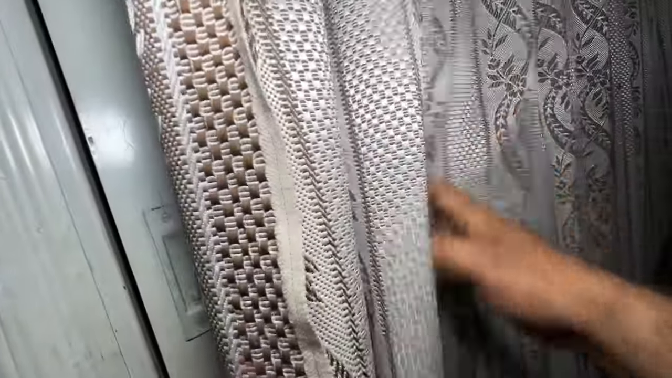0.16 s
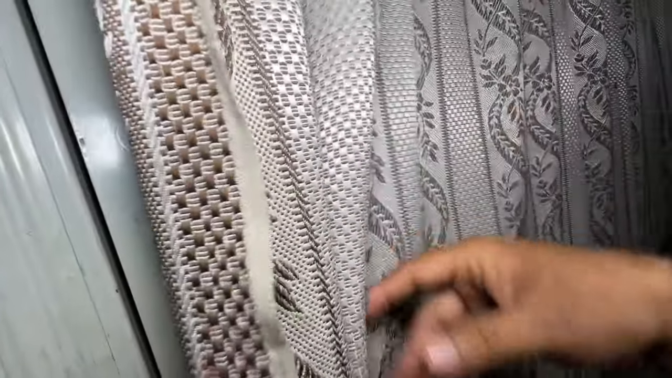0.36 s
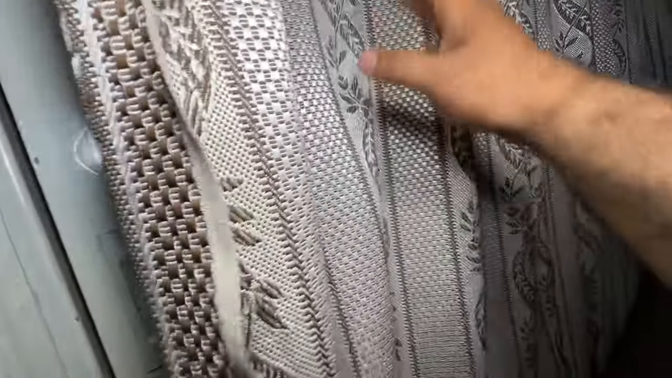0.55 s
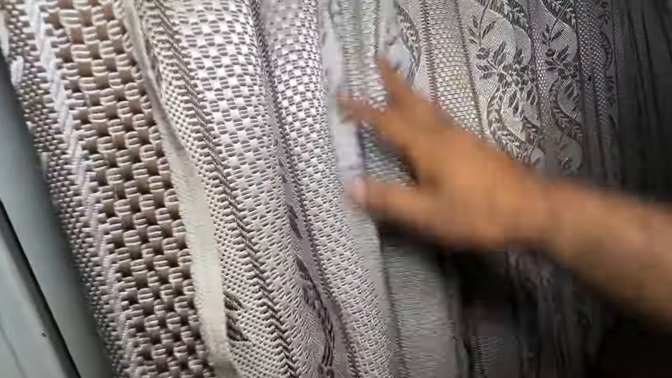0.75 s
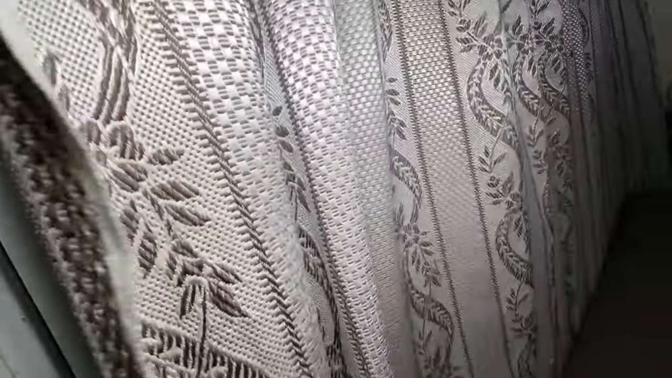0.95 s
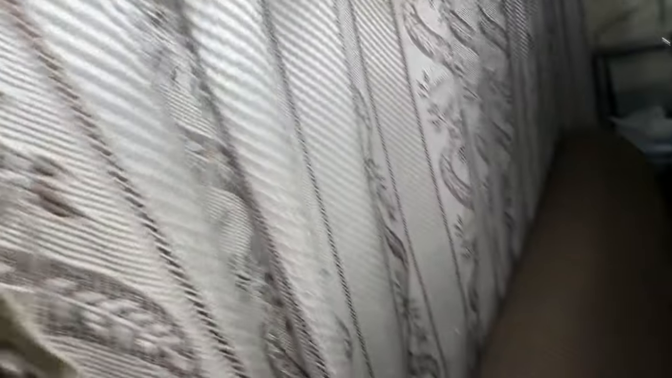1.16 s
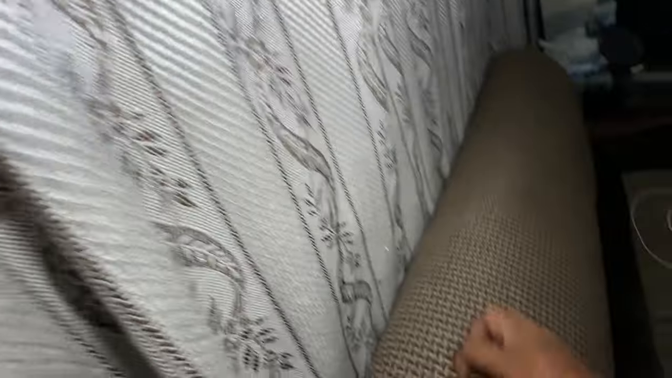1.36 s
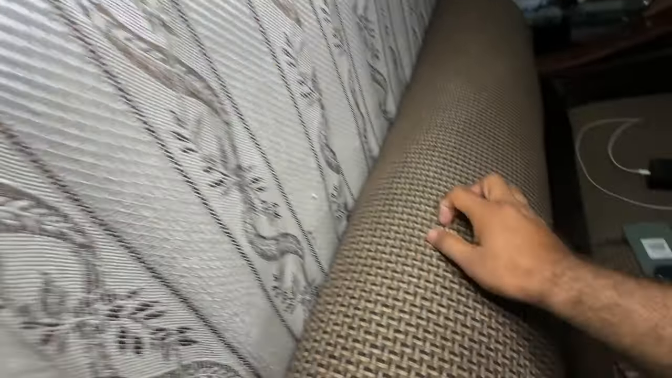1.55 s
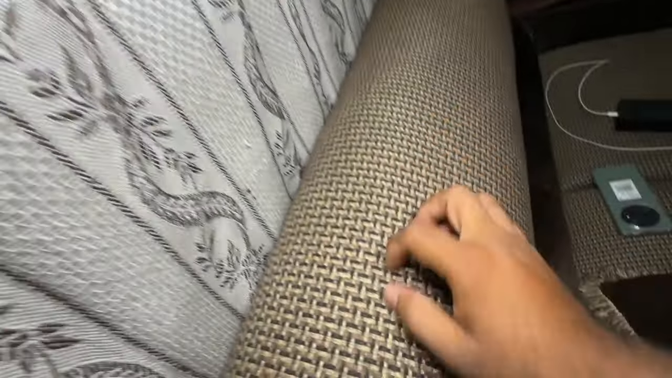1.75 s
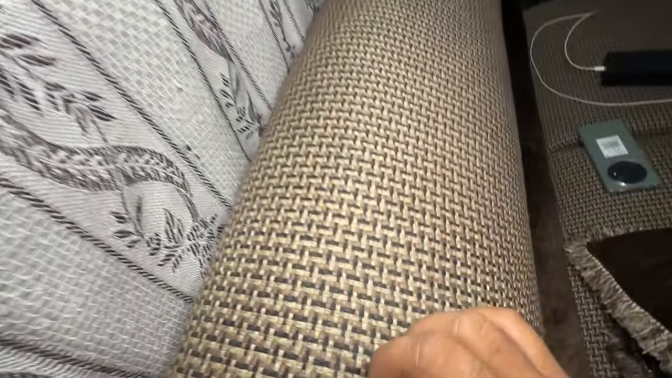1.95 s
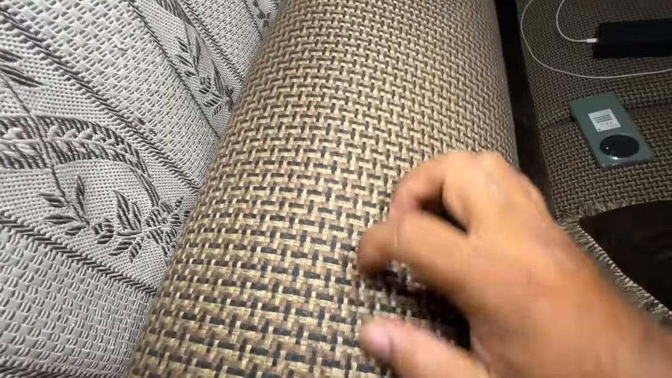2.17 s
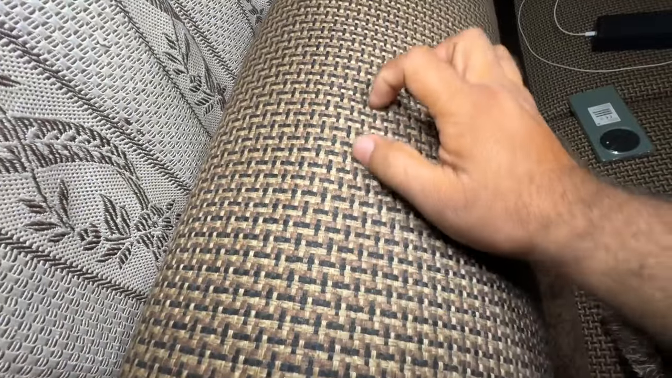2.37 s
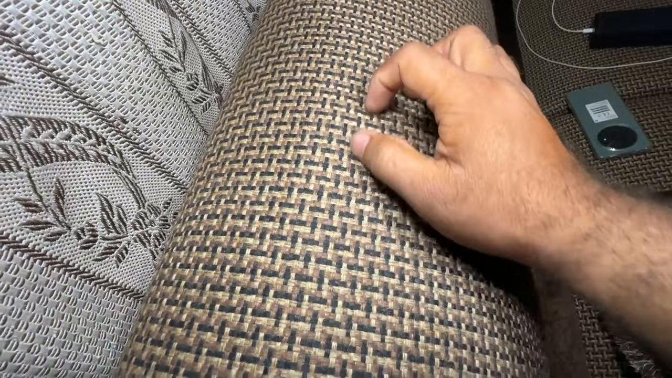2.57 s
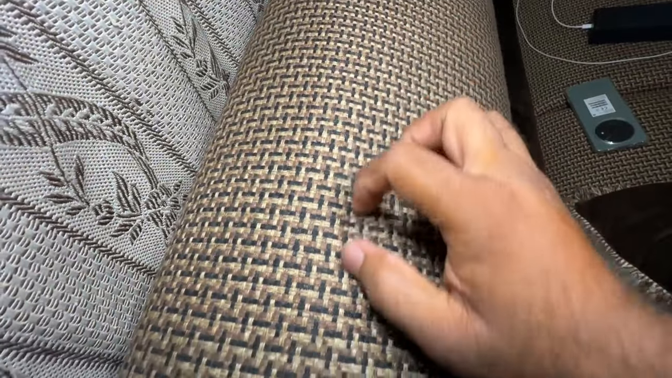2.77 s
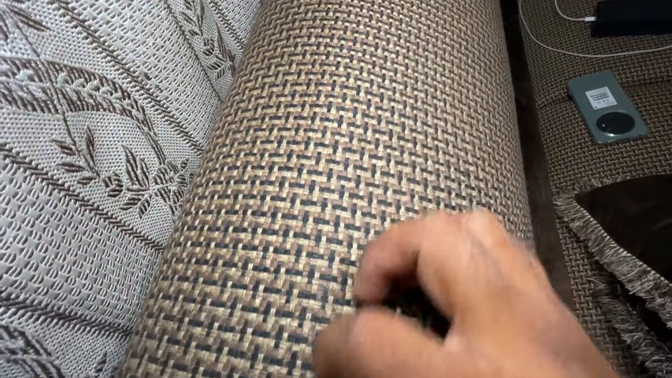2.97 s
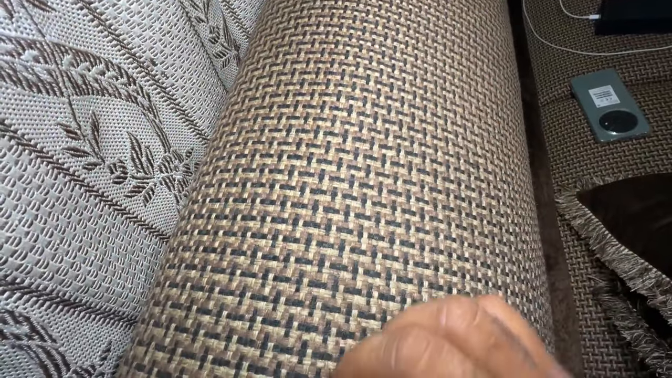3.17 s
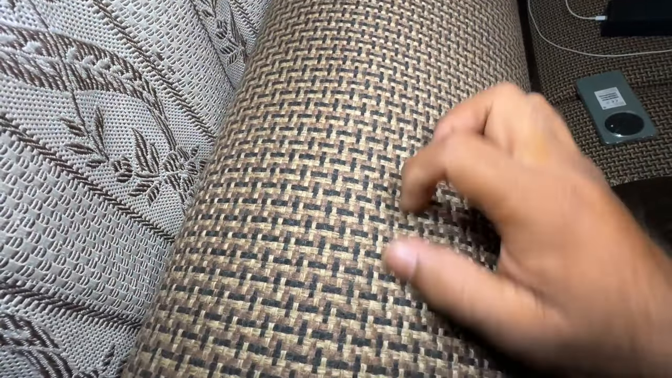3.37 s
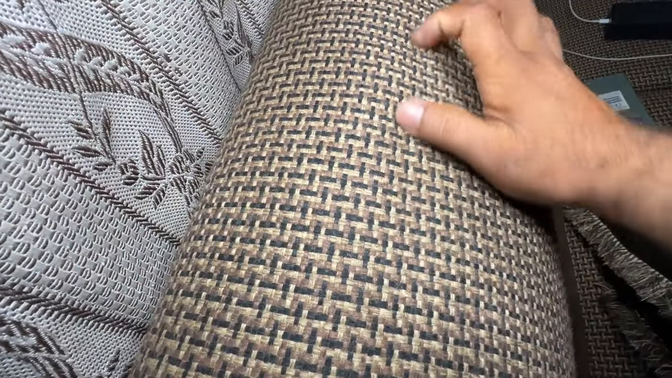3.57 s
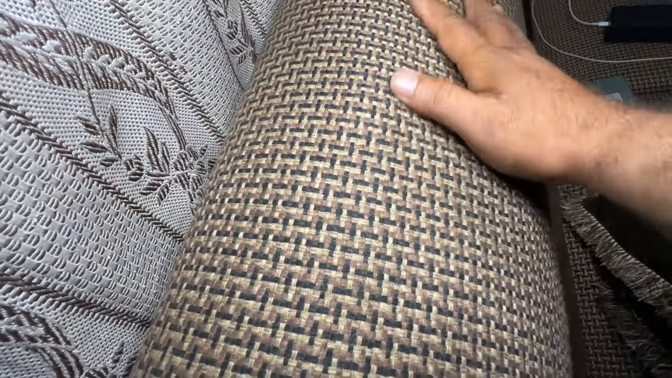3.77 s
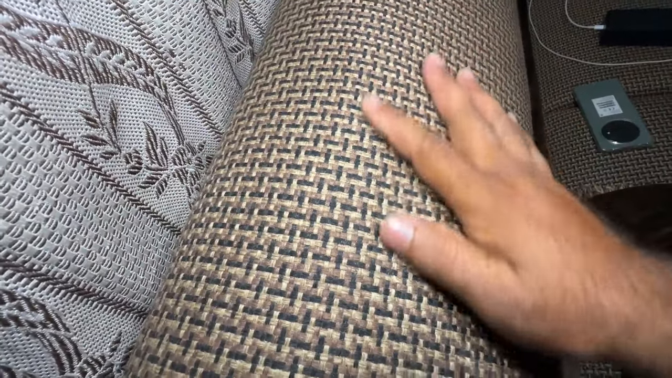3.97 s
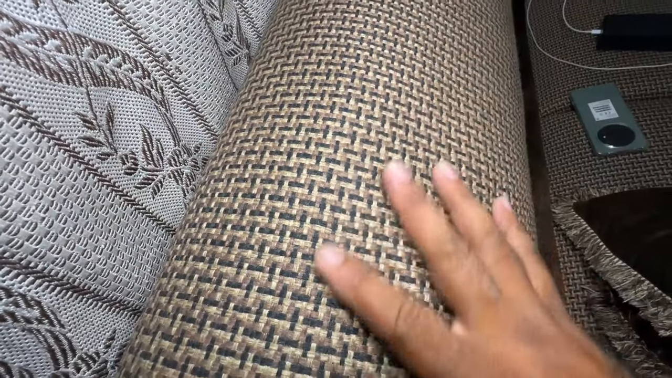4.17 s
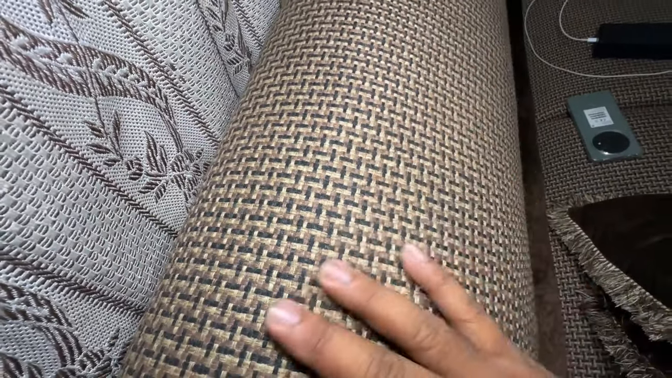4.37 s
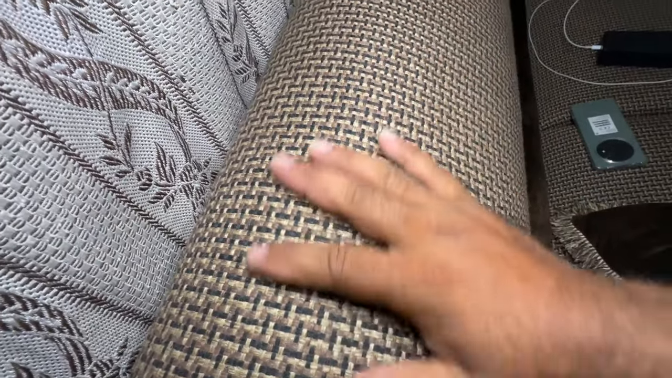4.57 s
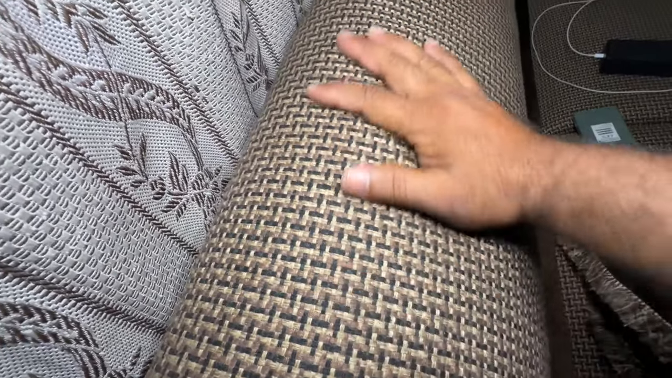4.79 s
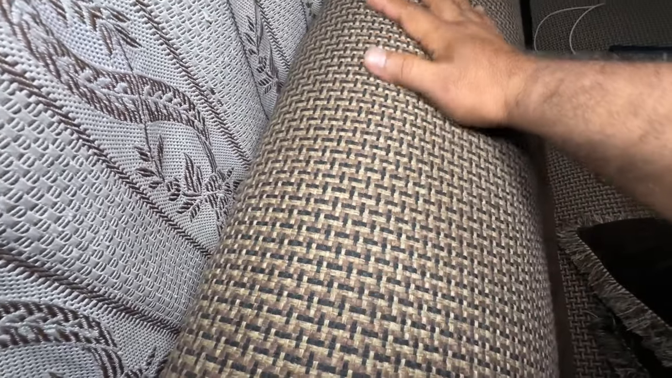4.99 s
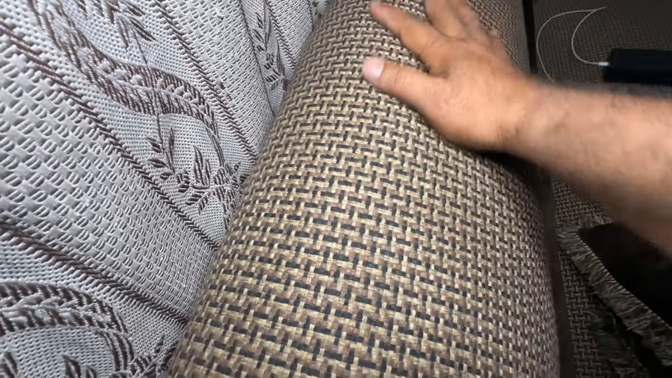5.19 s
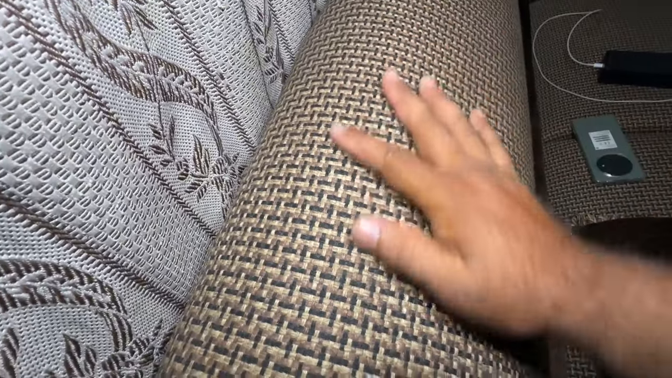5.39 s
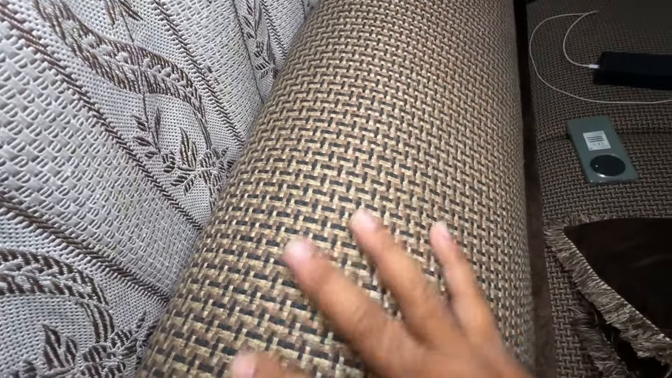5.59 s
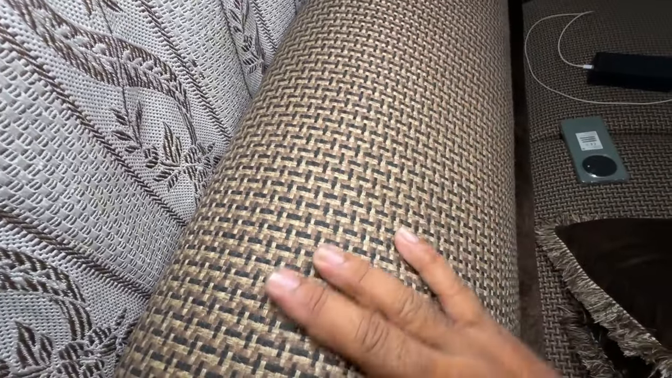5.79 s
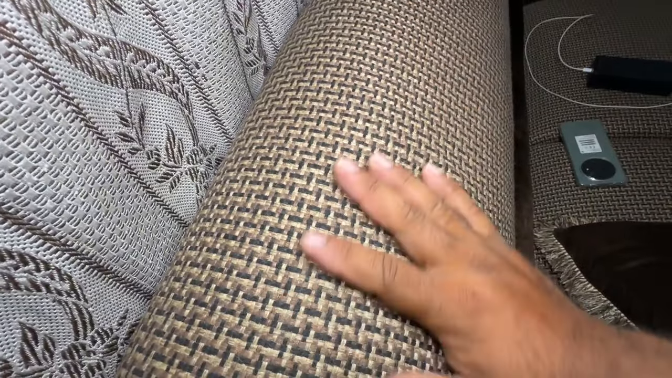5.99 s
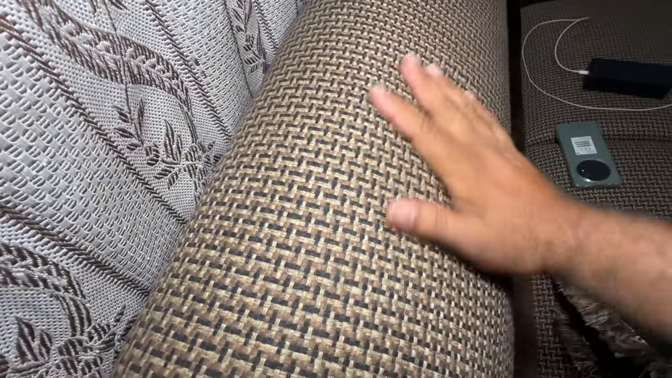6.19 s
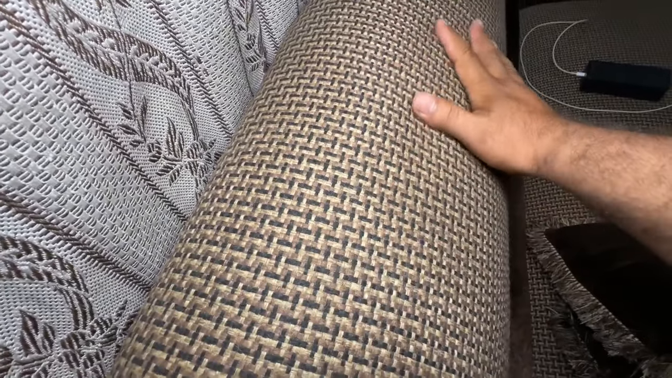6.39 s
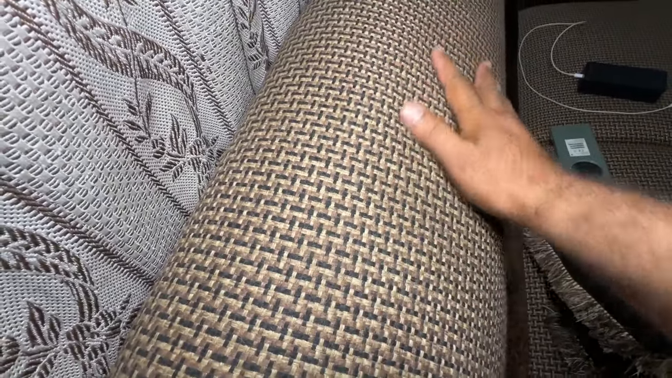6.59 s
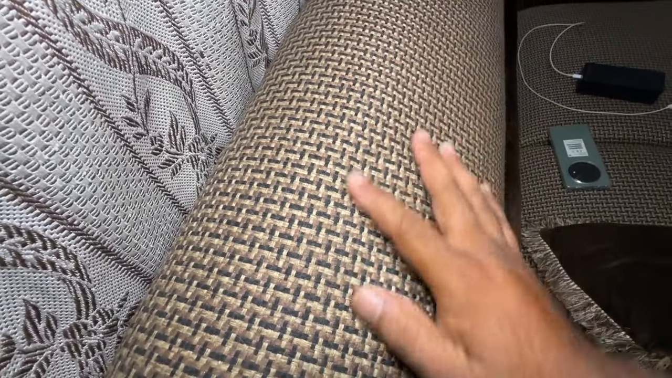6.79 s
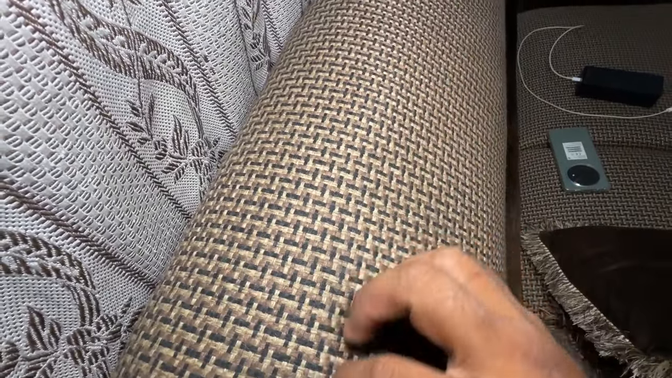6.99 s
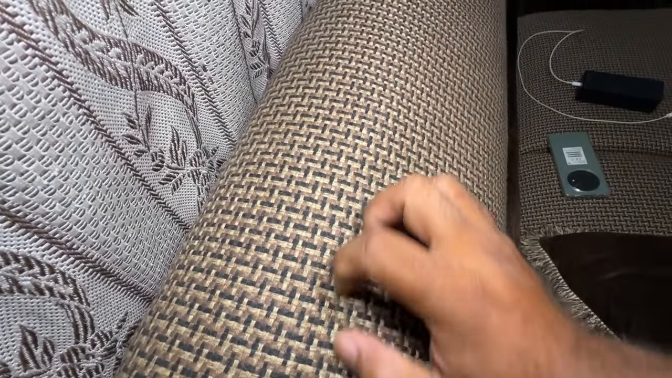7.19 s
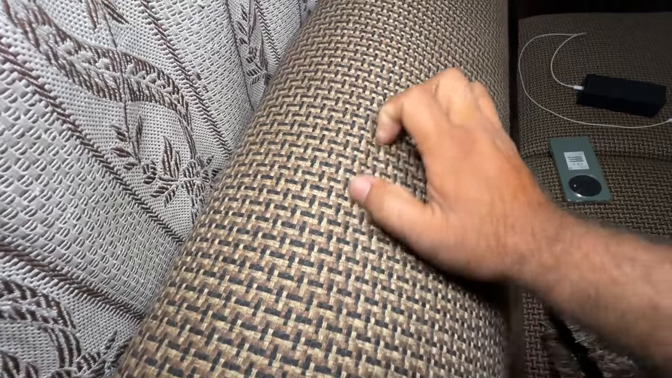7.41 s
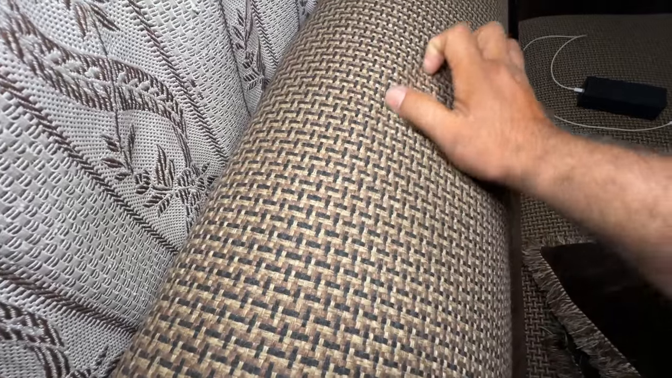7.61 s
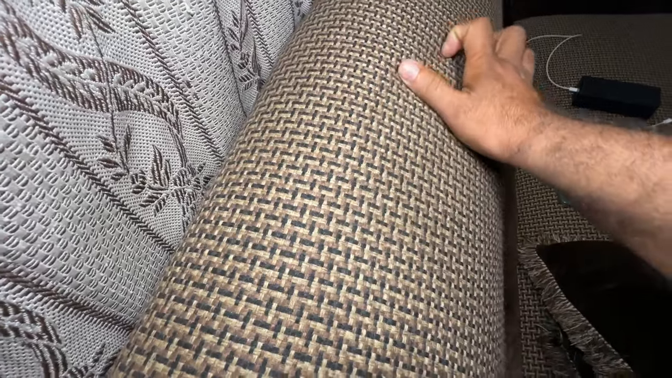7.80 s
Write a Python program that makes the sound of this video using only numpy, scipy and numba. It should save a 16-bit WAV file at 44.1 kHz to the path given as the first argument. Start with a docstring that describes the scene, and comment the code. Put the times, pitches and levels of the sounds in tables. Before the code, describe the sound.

In a quiet furnished room, close up, fingers brush and flick a loose woven cover with quick hisses, ticks and dull flaps. Fingernails then rake a coarse padded sofa arm, rasping over a low hollow thrum, with sharp snaps as threads catch. Flat fingers stroke to and fro in soft, airy swishes, and finally the nails scratch again, more gently. A faint steady room tone lies underneath.

```python
"""Fingernails rake a coarse sofa arm: thread after thread is plucked, so the padding thrums and the weave rasps.
Now and then a thread catches and snaps free with a sharp spike. Before that, fingers brush a hanging woven
cover that flutters and hisses, with flicks and dull flaps. Near the end of the raking and between its two bouts,
flat fingers stroke to and fro with a soft swish. Plucks are pulses and fine fibres are noise, shaped by filters
and by the speed of the hand. A quiet furnished room adds weak reflections and a steady background."""
import sys
import numpy as np
from scipy import signal
from scipy.fft import rfft, irfft
from scipy.io import wavfile
from scipy.ndimage import uniform_filter1d
from numba import njit

SR = 44100
rng = np.random.default_rng(int(sys.argv[2]) if len(sys.argv) > 2 else 0)


def file_out(sig):
    """Save sig as 16-bit WAV at sys.argv[1]."""
    # one column per channel
    cols = np.atleast_2d(sig).T
    # limit, then scale
    lim = np.clip(cols, -1, 1)
    pcm = np.round(lim * 32767).astype(np.int16)
    wavfile.write(sys.argv[1], SR, pcm)


N = 346185
T = np.arange(N) / SR  # time in s


def undb(db):
    """Turn decibels into a gain."""
    return 10 ** (np.asarray(db) / 20)


def unit(x):
    """Scale to rms 1, an average strength of one."""
    return x / np.sqrt(np.mean(x ** 2))


def speeds(strokes):
    """Speed of the hand in each stroke, 0-1: it starts from rest, peaks and slows to rest again."""
    curves = []
    for start, rise, fall, fullness, *_ in strokes:
        ramp = np.interp(T, start + np.cumsum([0, rise, fall]), [0, 1, 0])
        curves.append(1 - (1 - ramp) ** fullness)
    return np.array(curves)


def gains(speed, levels_db, powers):
    """One gain curve per layer: amplitude grows as speed to a power, and overlapping strokes add in power."""
    curves = []
    for db, power in zip(levels_db, powers):
        layer_power = undb(db) ** 2 @ (speed + 1e-9) ** (2 * power)
        curves.append(np.sqrt(layer_power))
    return np.array(curves)


def per_stroke(speed, values):
    """Each stroke's own value (a number or a curve), blended where strokes overlap."""
    curves = np.reshape(values, (len(speed), -1)) * np.ones(N)
    return np.average(curves, axis=0, weights=speed + 1e-9)


def pitch(speed, hz, sag):
    """Each stroke has its own pitch, which loses the share sag (0-1) as the hand comes to rest."""
    slowness = 1 - speed.max(axis=0)
    return per_stroke(speed, hz) * (1 - sag * slowness)


def wobble(depth_db, rate):
    """Uneven pressure: a gain that wanders at random around 1, with rate new random values per s."""
    wander = np.interp(T * rate, np.arange(N), rng.standard_normal(N))
    return undb(depth_db * wander)


def steady(x, span_s):
    """An even pressure of the hand holds the strength of a vibration near rms 1."""
    size = int(span_s * SR)
    power = uniform_filter1d(uniform_filter1d(x ** 2, size), size)
    return x / np.sqrt(power + 1e-9)


def colour(x, points):
    """Tone colour from (f/Hz, level/dB) points; the filter never acts early, so clicks keep their attack."""
    hz, db = np.transpose(points)
    size = 4096
    bins = np.maximum(np.fft.rfftfreq(size, 1 / SR), 1)
    # folding the cepstrum gives the minimum-phase filter with this spectrum
    cepstrum = irfft(np.log(undb(np.interp(np.log(bins), np.log(hz), db))))
    cepstrum[1:size // 2] *= 2
    cepstrum[size // 2 + 1:] = 0
    response = irfft(np.exp(rfft(cepstrum)))
    return unit(signal.fftconvolve(x, response)[:len(x)])


def resonate(x, hz, width_hz):
    """One damped resonance, gain 1 at its centre."""
    return signal.lfilter(*signal.iirpeak(hz, hz / width_hz, fs=SR), x)


@njit
def sweep(x, hz, width_hz):
    """A resonance whose centre moves from sample to sample (state-variable band-pass)."""
    y, band, low = np.empty(len(x)), 0., 0.
    for i in range(len(x)):
        g, k = np.tan(np.pi * hz[i] / SR), width_hz / hz[i]
        v = (band + g * (x[i] - low)) / (1 + g * (g + k))
        band, low, y[i] = 2 * v - band, low + 2 * g * v, k * v
    return y


def body(x, modes, top_hz):
    """A soft body: its modes ring, and the stuffing swallows the treble."""
    ring = sum(undb(db) * resonate(x, hz, width) for hz, width, db in modes)
    return unit(signal.sosfilt(signal.butter(2, [80, top_hz], "band", fs=SR, output="sos"), ring))


def crossings(rate, jitter):
    """Sample positions where a finger slips over the next thread of an uneven weave; median gap 1 / rate s."""
    gaps = np.exp(jitter * rng.standard_normal(N // 10)) / rate
    at = (np.cumsum(gaps) * SR).astype(int)
    return at[at < N]


def plucks(rate, jitter, scatter_db):
    """A pulse of random strength for each thread crossed."""
    strength = undb(scatter_db * np.clip(rng.standard_normal(N), -2, 2))
    at = crossings(rate, jitter)
    return np.bincount(at, strength[at], N)


def fibres(slips, decay_s, share):
    """Countless fibre clicks as noise; a share of its power comes in a short flurry after each slip."""
    flurry = signal.lfilter([1], [1, -np.exp(-1 / (decay_s * SR))], slips ** 2)
    return rng.standard_normal(N) * np.sqrt(1 - share + share * flurry / flurry.mean())


def place(sound, start_s):
    """A short sound set into the silence at its time."""
    return np.pad(sound, (int(start_s * SR), N))[:N]


# colour of the quiet room: (f/Hz, relative level/dB)
ROOM_TONE_COLOUR = [(20, -5), (35, -6), (52, -34), (120, 0.5), (220, 1), (420, 2.5), (700, -9.5),
                    (1500, -15.5), (3000, -19), (5700, -26), (6350, -23), (8500, -33), (16000, -33)]


def room_tone():
    """The steady, quiet background of the room: noise with a fixed colour."""
    return undb(-55) * colour(rng.standard_normal(N), ROOM_TONE_COLOUR)


# fingers brushing the hanging cover, levels before the final mix of layers: (start t/s, speeding up t/s,
# slowing down t/s, fullness: 1 = straight ramps, more = flatter top, less = sharper peak,
# flutter level/dB, rasp level/dB, fibre hiss level/dB, swish f/Hz at full speed)
COVER_STROKES = [(-0.02, 0.02, 0.021, 1.7, -54, -41, -47.5, 2000),
                 (0.045, 0.032, .045, 1.3, -64, -75, -69, 3000),
                 (0.133, 0.075, .1, 1.7, -44, -56.5, -48, 3440),
                 (0.398, .03, 0.099, 1.6, -53, -48, -63, 1500),
                 (0.462, 0.067, 0.096, 2.1, -41.5, -46.5, -52, 3000),
                 (0.717, 0.02, 0.096, 1.9, -47, -52, -53.5, 2800),
                 (0.76, .07, 0.096, 1.6, -57, -64, -50, 5300),
                 (0.845, 0.053, .043, 2.3, -39, -75, -56.5, 6300),
                 (0.95, 0.014, .17, 0.67, -39.5, -76, -75, 3000)]
# the loose cover keeps swaying between touches, levels before the final mix:
# (from t/s, until t/s, flutter level/dB, rasp level/dB, fibre hiss level/dB)
COVER_SWAY = (0, 2.4, -53, -63, -86)
# powers of speed for (flutter, rasp, hiss)
COVER_SPEED_POWERS = (0.99, 0.95, 0.89)
# resonances of the slack cover, also heard in the flicks: (f/Hz, width f/Hz, relative level/dB)
SLACK_MODES = [(108, 19, 0), (184, 40, 12.5), (223, 70, -5), (313, 93, -22), (570, 70, -38)]
# colour of the rub on the thin cover: (f/Hz, relative level/dB)
COVER_RUB_COLOUR = [(200, -27), (430, 5), (580, 9.5), (800, 2.5), (1200, 1.5), (1700, -2), (2600, -8.5),
                    (3600, -21), (7000, -17.5), (16000, -45)]
# colour of its fibre hiss: (f/Hz, relative level/dB)
COVER_HISS_COLOUR = [(500, -12), (1500, -4), (2700, -2), (4600, 1), (6800, -5.5), (8300, -7), (11000, -7.5),
                     (16000, -15)]


def cover():
    """Fingers drag over the loose cloth, which flutters low, rasps and hisses."""
    *_, flutter_db, rasp_db, hiss_db, swish_hz = np.transpose(COVER_STROKES)
    speed = speeds(COVER_STROKES)
    from_s, until_s, *sway_db = COVER_SWAY
    swaying = uniform_filter1d(1. * ((T >= from_s) & (T < until_s)), size=4000)  # softened ends
    touches = gains(speed, (flutter_db, rasp_db, hiss_db), COVER_SPEED_POWERS)
    flutter, rasp, hiss = np.hypot(touches, np.outer(undb(sway_db), swaying))
    slips = plucks(rate=380, jitter=0.65, scatter_db=4)

    low = body(fibres(slips, decay_s=0.0042, share=0.36), SLACK_MODES, top_hz=555)
    low = steady(low, span_s=0.015)
    mid = colour(fibres(slips, decay_s=.001, share=0.54), COVER_RUB_COLOUR)
    high = colour(fibres(slips, decay_s=0.0015, share=0.63), COVER_HISS_COLOUR)
    # a bright moving band within the hiss
    swish = unit(sweep(rng.standard_normal(N), pitch(speed, swish_hz, sag=0.4), 2500.0))
    high = unit(high + undb(-1) * swish)
    return undb(0.5) * flutter * low + undb(1.5) * rasp * mid + undb(2) * hiss * high


# fingertips and folds flicking against the cover, peak levels before the room:
# (t/s, tick level/dB, tick f/Hz, tick width f/Hz, thump level/dB)
FLICK_EVENTS = [(0.021, -45, 1760, 140, -46), (0.14, -42, 1000, 500, -54), (.329, -40.5, 1710, 130, -36.5),
                (.538, -30.5, 2660, 2500, -51), (0.724, -54, 2000, 2000, -43),
                (0.853, -59, 2500, 1500, -32), (0.953, -39, 5040, 2000, -30.5),
                (0.983, -47, 3000, 2500, -36), (1.119, -47, 3500, 2500, -37.5)]


def flicks():
    """A light tick or squeak at the touch, followed by the dull flap of the slack cloth."""
    t, out = T[:8192], np.zeros(N)
    flap = body(1. * (t == 0), SLACK_MODES, top_hz=400)
    flap = flap / np.abs(flap).max()
    grits = rng.standard_normal((len(FLICK_EVENTS), len(t)))
    for (start, tick_db, hz, width, thump_db), grit in zip(FLICK_EVENTS, grits):
        scrape = grit * np.exp(-t / 0.0039)
        tick = resonate(resonate(scrape, hz, width), hz, hz)
        out += place(undb(tick_db) * tick / np.abs(tick).max(), start)
        out += place(undb(thump_db) * flap, start + 0.00253)
    return out


# nail strokes along the sofa arm, levels before the final mix of layers; overlapping rows add up, as when
# the nails ease in or dig harder: (start t/s, speeding up t/s, slowing down t/s, fullness as for the cover,
# thrum level/dB, rasp level/dB, fibre hiss level/dB, padding within the thrum level/dB,
# thrum f/Hz at the peak of speed, thrum glide octaves per s (minus sinks), rasp f/Hz at full speed)
NAIL_STROKES = [(1.318, 0.18, 0.066, 2.5, -43, -43.5, -61, -3.5, 310, -0.3, 600),
                (1.385, 0.072, .05, 1.1, -46, -40, -73, -18, 305, -0.17, 600),
                (1.616, 0.11, .295, 2.3, -35.5, -40.5, -55.5, -3, 354, -0.042, 515),
                (1.715, 0.096, 0.096, 1.9, -48, -34.5, -52.5, -11, 380, 0.35, 525),
                (2.031, .24, 0.19, 1.35, -36, -37, -52.5, -9, 300, -.2, 647),
                (2.54, 0.097, .505, 3.9, -36.5, -38.5, -56, 1.5, 269, 0.83, 524),
                (3.14, 0.2, .08, 0.8, -42.5, -42, -61.5, 0, 285, -0.19, 565),
                (3.255, .09, 0.3, 1.6, -37.5, -39.5, -53.5, -1.5, 327, -0.58, 570),
                (3.475, 0.087, 0.053, 1.1, -36, -28, -45, -4, 257, 0, 620),
                (6.88, 0.051, 0.059, 1.24, -44.5, -42, -64, -2, 347, 0, 625),
                (7.04, 0.19, 0.17, 1.6, -43, -49, -57, 3, 275, -0.57, 520),
                (7.23, .36, .235, 1.84, -41.5, -45.5, -51.5, 1.5, 270, -2.2, 620),
                (7.64, 0.14, 0.054, 1, -40, -45.5, -71, 1, 193, 0, 714),
                (7.816, 0.042, .1, 1, -50, -46.5, -56, 5, 250, 0.016, 600)]
# powers of speed for (thrum, rasp, hiss)
NAIL_SPEED_POWERS = (0.83, 1.035, 0.77)
# resonances of the padded arm: (f/Hz, width f/Hz, relative level/dB)
PADDING_MODES = [(120, 70, -16.5), (217.6, 43, 1.5), (324, 125, -2.5)]
# colour of the rasping weave: (f/Hz, relative level/dB)
RASP_COLOUR = [(150, -29), (380, -5), (520, 4), (720, 4.5), (870, 1), (1080, 0.5), (1500, -4), (2100, -10),
               (2700, -13), (3300, -17.5), (4300, -16), (6500, -25.5), (9000, -39), (16000, -57)]
# colour of the hiss under the nails: (f/Hz, relative level/dB)
NAIL_HISS_COLOUR = [(500, -16), (1500, 4), (2600, -4), (3200, -1.5), (4300, -5.5), (6300, -3.5),
                    (8500, -7.5), (12000, -11.5), (16000, -21)]
# colour of single popping fibres: (f/Hz, relative level/dB)
CRACKLE_COLOUR = [(500, -20), (1500, -3), (3000, -11), (6500, -6), (9000, -17.5), (16000, -24)]


def nails():
    """Nails pluck the threads; each pluck kicks the padding, rasps the weave and sheds a puff of hiss."""
    (start, rise, _, _, thrum_db, rasp_db, hiss_db, padding_db,
     thrum_peak_hz, glide, rasp_peak_hz) = np.transpose(NAIL_STROKES)
    speed = speeds(NAIL_STROKES)
    layers = gains(speed, (thrum_db, rasp_db, hiss_db), NAIL_SPEED_POWERS)
    # the nails press unevenly
    thrum, rasp, hiss = layers * wobble(depth_db=1.23, rate=39)

    gliding_hz = []
    for hz, slope, peak_s in zip(thrum_peak_hz, glide, start + rise):
        from_peak_s = np.clip(T - peak_s, -.5, .5)
        gliding_hz.append(hz * 2 ** (slope * from_peak_s))
    thrum_hz = pitch(speed, gliding_hz, sag=0.091)
    rasp_hz = pitch(speed, rasp_peak_hz, sag=0.044)

    # two nails lead, each on its own row of the weave
    slips = plucks(rate=280, jitter=.6, scatter_db=3.5) + plucks(rate=210, jitter=.7, scatter_db=1.5)
    kicks = unit(slips.mean() - slips)
    cloth = unit(sweep(sweep(kicks, thrum_hz, 89.0), thrum_hz, 193.0))
    padding = body(fibres(slips, decay_s=0.0029, share=1.0), PADDING_MODES, top_hz=600)
    low = steady(cloth + undb(per_stroke(speed, padding_db)) * padding, span_s=0.019)

    # threads spring back to either side of the nail
    twangs = unit(slips * rng.choice([-1, 1], N))
    weave = unit(sweep(sweep(twangs, rasp_hz, 73.0), rasp_hz, 370.0))
    # the weave rings out most at the height of a stroke
    ringing = speed.max(axis=0) ** 2.2
    rub = colour(fibres(slips, decay_s=0.00071, share=0.7), RASP_COLOUR)
    mid = steady(rub + ringing * weave, span_s=0.015)
    # the harder the nails bite, the louder single fibres pop
    crackle = colour(plucks(rate=170, jitter=.8, scatter_db=6.5), CRACKLE_COLOUR)

    # a nail that glides lightly whispers brighter than one that digs in
    lightness = hiss / (hiss + rasp + 1e-9)
    high = colour(fibres(slips, decay_s=0.0011, share=0.14), NAIL_HISS_COLOUR)
    treble = signal.butter(2, 7500, "high", fs=SR, output="sos")
    sheen = unit(signal.sosfilt(treble, rng.standard_normal(N)))

    thrumming = undb(0.5) * thrum * low
    rasping = rasp * (undb(0.5) * mid + undb(-22) * crackle)
    hissing = hiss * (undb(4.5) * high + undb(5.0) * lightness * sheen)
    return thrumming + rasping + hissing


# threads that catch on a nail and snap free, peak levels before the room:
# (t/s, level/dB, brightness f/Hz: upper edge of the snap)
SNAG_EVENTS = [(1.634, -46, 3020), (1.691, -27, 3000), (1.716, -24, 4000), (1.742, -22, 6000),
               (1.7810, -21, 5000), (1.827, -30, 2500), (1.8707, -23, 7000), (2.383, -25.5, 2000),
               (2.5527, -20.5, 6825), (2.6130, -27, 5000), (2.663, -16.5, 4500), (2.7218, -13.5, 7000),
               (2.75, -22.5, 6000), (2.7851, -17.5, 4970), (2.8216, -14.5, 5760), (2.8286, -21.5, 2960),
               (2.873, -14.5, 6370), (2.9482, -21.5, 6000), (3.008, -29.5, 2500), (3.105, -25.5, 6160)]


def snags():
    """A caught thread lets go with one sharp spike, then shivers for a few milliseconds."""
    t, out = T[:2048], np.zeros(N)
    soften = signal.butter(2, 7000, fs=SR, output="sos")
    shivers = rng.standard_normal((len(SNAG_EVENTS), len(t)))
    for (start, db, hz), shiver in zip(SNAG_EVENTS, shivers):
        release = (t == 0) + undb(-21.0) * shiver * np.exp(-t / 0.0012)
        snap = signal.sosfilt(signal.butter(1, [900, hz], "band", fs=SR, output="sos"), release)
        snap = signal.sosfilt(soften, snap)
        out += place(undb(db) * snap / np.abs(snap).max(), start)
    return out


# flat fingers sweeping to and fro, levels before the final mix of layers: (start t/s, speeding up t/s,
# slowing down t/s, fullness as for the cover, rub level/dB, swish level/dB, fibre hiss level/dB,
# swish f/Hz at full speed)
PALM_STROKES = [(3.58, 0.026, 0.13, 0.91, -62, -65, -49, 1000),
                (3.725, 0.18, 0.39, 1.1, -52.5, -55, -47, 1304),
                (3.93, 0.35, 0.17, 1.9, -58, -57, -53, 1100),
                (4.385, .425, .285, 1.75, -49.5, -50, -45.5, 1230),
                (5.103, .2, .41, 2.54, -53.5, -57, -47, 1450),
                (5.703, .522, .25, 1.08, -50.5, -49.3, -44, 1270),
                (6.45, 0.26, 0.28, 1.37, -53.5, -56, -47, 1460),
                (6.78, 0.13, 0.11, 1.14, -59, -68, -50.5, 700)]
# powers of speed for (rub, swish, hiss)
PALM_SPEED_POWERS = (0.91, 0.68, 0.95)
# colour of the murmuring padding: (f/Hz, relative level/dB)
PALM_THRUM_COLOUR = [(50, -18), (90, -34), (130, -2.5), (165, -11.5), (205, 7), (270, -2), (480, -1.5),
                     (620, -7), (1200, -16.5), (4000, -61)]
# colour of skin rubbing on cloth: (f/Hz, relative level/dB)
PALM_RUB_COLOUR = [(200, -17), (450, -3.5), (750, 2.5), (1150, 1), (1600, -2), (2100, -0.5), (3200, -15.5),
                   (6000, -30), (16000, -34)]
# colour of the fibre hiss under the skin: (f/Hz, relative level/dB)
PALM_HISS_COLOUR = [(500, -16.5), (1500, 1.5), (2600, 0.5), (4300, -0.5), (6300, -3), (8500, -7),
                    (12000, -9.5), (16000, -14.5)]


def palm():
    """Soft skin touches many threads at once, so their slips merge into a swish."""
    *_, rub_db, swish_db, hiss_db, swish_hz = np.transpose(PALM_STROKES)
    speed = speeds(PALM_STROKES)
    rub, sweeping, hiss = gains(speed, (rub_db, swish_db, hiss_db), PALM_SPEED_POWERS)
    slips = plucks(rate=970, jitter=.7, scatter_db=5.5)
    # the weight of the hand keeps the padding murmuring even as the stroke slows
    thrum = undb(-53.5) * (rub / rub.max()) ** 0.27
    low = colour(fibres(slips, decay_s=0.00087, share=1.0), PALM_THRUM_COLOUR)
    stirred = fibres(slips, decay_s=0.0011, share=0.25)
    swish = unit(sweep(stirred, pitch(speed, swish_hz, sag=0.5), 490.0))
    mid = colour(fibres(slips, decay_s=0.00092, share=0.22), PALM_RUB_COLOUR)
    high = colour(fibres(slips, decay_s=0.00058, share=0.08), PALM_HISS_COLOUR)
    return thrum * low + undb(1.5) * (rub * mid + sweeping * swish) + undb(2.0) * hiss * high


def room(x, t60_s, wet_db):
    """Weak, short reflections from the furniture and walls: noise that fades by 60 dB in t60_s."""
    t = T[:SR // 2]
    tail = rng.standard_normal(len(t)) * undb(-60 * t / t60_s) * (t > .003)
    tail = tail / np.linalg.norm(tail)
    tail = signal.sosfilt(signal.butter(1, 6000, fs=SR, output="sos"), tail)
    return x + undb(wet_db) * signal.fftconvolve(x, tail)[:N]


def scene():
    """The hand's sounds in the room, the same in both ears."""
    touches = cover() + flicks() + nails() + snags() + palm()
    mono = room(touches, t60_s=0.28, wet_db=-19) + room_tone()
    return np.array([mono, mono])


def record(dry):
    """The recorder steeply cuts everything above 15850 Hz."""
    return signal.sosfilt(signal.ellip(10, .1, 80, 15850, fs=SR, output="sos"), dry)


dry = scene()
out = record(dry)
file_out(out)
```